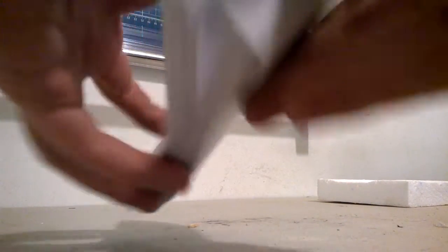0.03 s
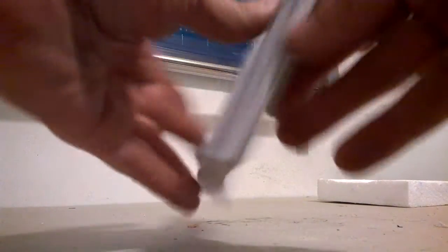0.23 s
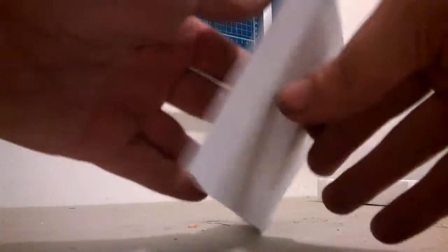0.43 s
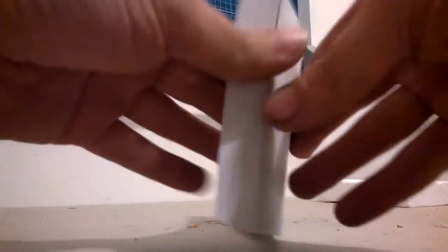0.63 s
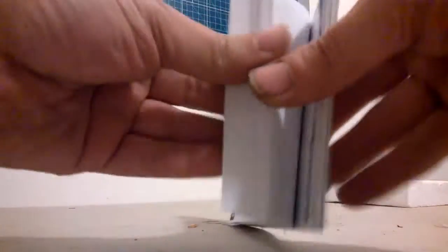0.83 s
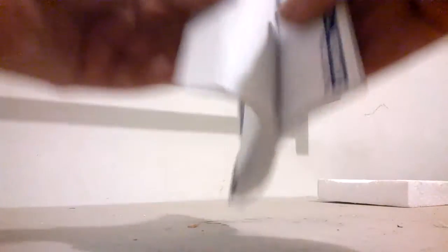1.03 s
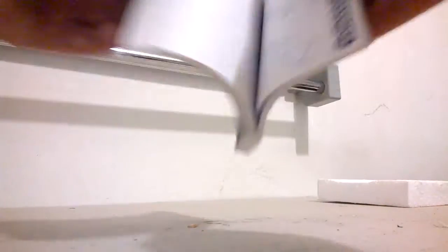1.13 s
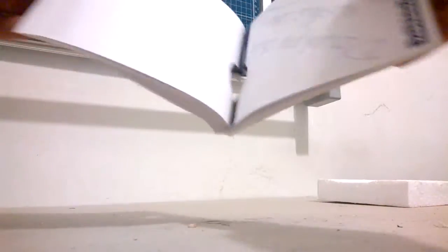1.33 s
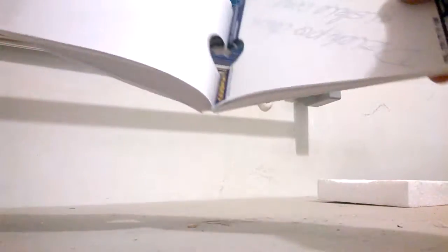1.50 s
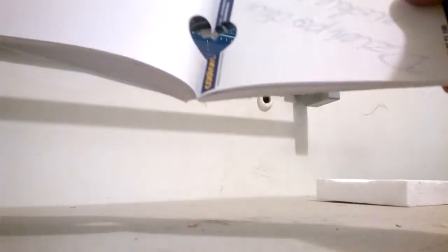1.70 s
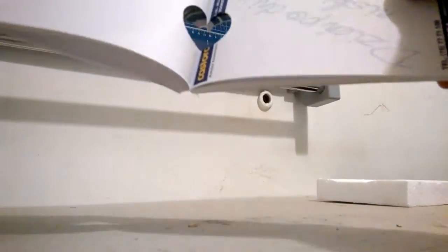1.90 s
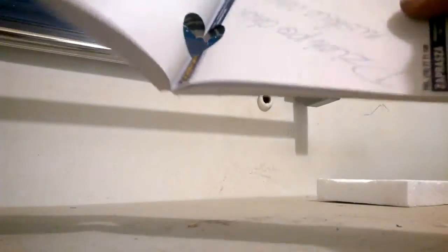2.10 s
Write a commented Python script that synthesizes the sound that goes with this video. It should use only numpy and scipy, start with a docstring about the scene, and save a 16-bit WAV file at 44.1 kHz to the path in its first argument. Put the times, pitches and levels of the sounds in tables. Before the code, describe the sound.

Paper rustles and snaps as a thick pad is tapped on a bench and opened.

```python
"""A thick paper pad is stood on a workbench and opened, close to the microphone.
Its stiff sheets snap under impulsive forces and hiss with sliding friction. Fingers rub the cover
by stick-slip, and the edge lands twice, knocking and exciting the damped modes of the bench.
The opening pages push a puff of air. A small, hard-walled room reverberates and hums faintly."""
import sys
import numpy as np
from scipy import signal
from scipy.fft import rfft, irfft, next_fast_len
from scipy.io import wavfile
from scipy.ndimage import map_coordinates

SR = 44100
rng = np.random.default_rng(int(sys.argv[2]) if len(sys.argv) > 2 else 0)


def persist_wave(psi):
    """Save psi, clipped to +-1, as 16-bit WAV."""
    counts = np.round(np.clip(psi, -1, 1) * 32767).astype(np.int16)
    wavfile.write(sys.argv[1], SR, np.atleast_2d(counts).T)


N = 94815
T = np.arange(N) / SR

# Snaps: (time [s], level [dB], centre [Hz], width [octaves], T60 [s], cutoff [Hz])
SNAPS = [(0.1529, -47, 2760, 0.81, 0.02, 13000), (0.2592, -38.5, 4370, 0.77, 0.0032, 10000),
         (0.2847, -34, 3380, 0.45, 0.041, 10500), (0.2843, -37.5, 8360, 0.31, 0.03, 11100),
         (0.4411, -30, 6100, 0.1, 0.0051, 15000), (0.4438, -46, 4160, 2, 0.024, 15000),
         (.4585, -47, 3000, 2.9, 0.011, 14000), (0.4752, -33, 2540, 1.8, 0.045, 13800),
         (0.662, -54, 5560, 0.075, 0.022, 15000), (0.9351, -50, 3080, 0.11, 0.0036, 10000),
         (0.9522, -44, 2980, 0.32, 0.0034, 10000), (0.969, -44.5, 6700, 0.28, 0.011, 12100),
         (1.0178, -28.5, 5570, 0.5, 0.0033, 19000), (1.0176, -34.5, 2170, 0.15, 0.0062, 15000),
         (1.0199, -33.5, 4580, 0.14, 0.01, 10000), (1.0263, -45, 4600, 0.24, 0.033, 9500),
         (1.0318, -40, 2200, 1.1, 0.0093, 13000), (1.041, -31.5, 3960, 1.48, 0.0076, 10200),
         (1.0437, -47, 4730, 1.4, 0.019, 10100), (1.259, -55, 5020, 0.083, 0.016, 10500),
         (1.3733, -48.5, 7450, 1.45, 0.015, 18000), (1.4218, -38.5, 6770, 0.26, 0.016, 18000),
         (1.422, -38.5, 3570, 0.46, 0.011, 15900)]
# Response of the paper: (frequency [Hz], gain [dB])
PAPER_RESPONSE = [(200, -10), (900, 6.5), (1700, 2), (2250, 3), (2900, 0.5), (4600, 1), (5600, -1.5),
                  (6700, 3), (8500, -2), (11000, -6.5), (15500, -9)]
def sheet_snaps(widen=1, size=8192):
    """Impulse excitation: a sharp push and a dying flutter drive one resonant band of a stiff sheet."""
    out, t, hz = np.zeros(N), np.arange(size) / SR, np.fft.rfftfreq(size, 1 / SR)
    rise_s = 0.00033
    for start, db, centre_hz, octaves, t60, cutoff_hz in SNAPS:
        force = rng.standard_normal(size) * amp(-60 * t / t60) * (1 - np.exp(-t / rise_s))
        force[round(rise_s * SR)] += 1.94  # the push
        crack = amp(-16.5) * band(hz, 5950, octaves=1.65)
        resonance = band(hz, centre_hz, octaves * widen) + crack
        gain = resonance * amp(log_interp(PAPER_RESPONSE, hz)) / np.sqrt(1 + (hz / cutoff_hz) ** 10)
        snap = irfft(rfft(force) * minimum_phase(gain + 0.00105))
        duration_s = 0.002 + t60 / np.log(1e6)  # the level is an rms over this span
        add(out, start, amp(db) * snap * np.sqrt(duration_s * SR / np.sum(snap ** 2)))
    return out


# Knocks: (time [s], level [dB], pitch [Hz], T60 [s], rattle amplitude [ratio])
KNOCKS = [(0.2885, -23, 520, 0.026, 0.92), (.3066, -16, 744, 0.015, 0.22), (0.4755, -27, 699, 0.045, 0.54),
          (0.4752, -33.5, 250, 0.023, 0.64), (1.0403, -46, 1030, 0.014, 0.41)]
def edge_knocks(rise_s=0.00028):
    """Damped oscillation: the block of paper rings and rattles briefly where its edge strikes."""
    out = np.zeros(N)
    for start, db, pitch_hz, t60, roughness in KNOCKS:
        ring = np.sin(2 * np.pi * pitch_hz * T) + roughness * band_noise(pitch_hz, octaves=0.83)
        add(out, start, ring * amp(db - 60 * T / t60) * (1 - np.exp(-T / rise_s)))
    return out


# Impacts of the pad's weight: (time [s], ring gain [dB], thud level [dB])
LANDINGS = [(.288, -5, -34.5), (.299, 3, -37), (0.477, -13, -49.5)]
# Modes of the bench: (frequency [Hz], relative level [dB], T60 [s])
BENCH_MODES = [(26.35, -32.5, 1.19), (77.9, -38, 0.38), (86.2, -45, 1.1), (135.1, -44.5, 0.68),
               (155.3, -34, 0.35), (241, -43.5, 0.57), (308.8, -41, 0.21), (517, -47, 0.45),
               (591, -50, 0.39), (657, -55, 0.25)]
# Spectra of the thud and of things shuddering on the bench: (frequency [Hz], relative level [dB])
THUD_SPECTRUM = [(30, -12), (80, 7.5), (160, 0), (200, -21), (300, -6), (500, -4.5), (750, -8), (1100, -20),
                 (2000, -43), (8000, -71.5)]
RUMBLE_SPECTRUM = [(15, -28), (35, -8), (55, 12), (85, -0.5), (130, 4.5), (200, -15), (300, -10),
                   (600, -52.5)]
def bench(rise_s=0.0036, thud_t60=0.36, rumble_t60=0.92):
    """Modal vibration: each impact rings the bench, with a short thud and a longer rumble."""
    out = np.zeros(N)
    waver_db, waver_cycles = 3.5, 5.1  # the hands damp the modes unevenly
    for start, ring_db, thud_db in LANDINGS:
        ring = np.zeros(N)
        for hz, db, t60 in BENCH_MODES:
            envelope = amp(db - 60 * T / t60 + waver_db * wobble(hz / waver_cycles))
            ring += envelope * np.sin(2 * np.pi * hz * T)
        thud = noise(THUD_SPECTRUM) * amp(thud_db - 60 * T / thud_t60)
        rumble = noise(RUMBLE_SPECTRUM) * amp(thud_db - 5.5 - 60 * T / rumble_t60)
        add(out, start, (thud + rumble - amp(ring_db) * ring) * (1 - np.exp(-T / rise_s)))
    return out


# Envelopes of sheets sliding and of open pages settling: (time [s], level [dB])
SLIDE_LEVEL = [(0, -62), (.07, -71.5), (.14, -60.5), (.185, -60), (.24, -50), (.275, -51), (.30, -43.5),
               (.36, -52), (.41, -66.5), (.445, -54), (.474, -41), (.51, -59), (.56, -65), (.62, -63.5),
               (.75, -66.5), (.89, -63), (.94, -56.5), (1.0, -61.5), (1.04, -68), (1.12, -66.5),
               (1.16, -67), (1.195, -69), (1.225, -74), (1.3, -75), (1.5, -74.5), (1.62, -81)]
SETTLE_LEVEL = [(1.93, -100), (1.98, -82), (2.06, -65), (2.095, -69), (2.15, -75)]
# Their spectra: (frequency [Hz], relative level [dB])
SLIDE_SPECTRUM = [(150, 5), (600, 8.5), (1100, 4.5), (1700, 0.5), (3000, 3.5), (5000, .5), (6000, -1),
                  (7300, -2), (9500, -40), (15500, -33)]
SETTLE_SPECTRUM = [(300, -18), (1800, -4.5), (4000, -3.5), (6500, 3), (9000, -12), (14000, -28)]
def sliding(envelope, spectrum, grains_per_s=1400, grain_share=0.26, waver_db=2):
    """Sliding friction: paper fibres catch and release, making tiny grains in a soft hiss."""
    grains = unit((rng.random(N) < grains_per_s / SR) * rng.standard_normal(N))
    friction = np.sqrt(grain_share) * grains + np.sqrt(1 - grain_share) * rng.standard_normal(N)
    level_db = np.interp(T, *np.transpose(envelope), left=-120) + waver_db * wobble(70.2)
    return amp(level_db) * unit(filtered(friction, lambda hz: amp(log_interp(spectrum, hz))))


# Spectrum of the crinkle: (frequency [Hz], relative level [dB])
CRINKLE_SPECTRUM = [(1500, -33), (2400, -14), (3400, 2), (4200, -18), (4900, 14.5), (6000, -37), (7200, 2),
                    (8400, 7), (9500, -2), (11000, -5), (12200, -5.5), (14000, -17), (15500, -25)]
def crinkle(exponent=1.69, clumps_per_s=400):
    """Power-law growth: as the sheets slide harder, their crinkle rises faster than their hiss."""
    slide_db = np.interp(T, *np.transpose(SLIDE_LEVEL))
    peak_db = slide_db.max()
    clumps = unit(noise(CRINKLE_SPECTRUM) * amp(wobble(clumps_per_s)))
    return clumps * amp(peak_db - 1 + exponent * (slide_db - peak_db))


# Rubs on the cover: (time [s], level [dB], duration [s], band centre [Hz])
RUBS = [(0.209, -42, 0.024, 964), (0.222, -46, 0.025, 740), (0.235, -45.5, 0.03, 920)]
def finger_rubs(slips_per_s=480, scatter_db=8.5):
    """Stick-slip friction: skin judders over the cover in short swells of uneven pulses."""
    out = np.zeros(N)
    for start, db, duration, centre_hz in RUBS:
        slip_count = np.cumsum(slips_per_s * np.exp(0.22 * wobble(200))) / SR
        slips = np.diff(np.floor(slip_count), prepend=0) * amp(scatter_db * wobble(292.65))
        rub = filtered(slips, lambda hz: band(hz, centre_hz, 0.32) + amp(-24) * band(hz, 550, 0.38))
        swell = np.sin(np.pi * T[T < duration] / duration)
        add(out, start, amp(db) * unit(rub[round(start * SR):][:len(swell)] * swell))
    return out


def air_puff(peak_s=0.982, width_s=0.02, level_db=-58.5):
    """Air displacement: the opening pages fan a low pressure pulse at the microphone."""
    return band_noise(72, octaves=0.43) * amp(level_db) * np.exp(-0.5 * ((T - peak_s) / width_s) ** 2)


# Reverberation time of the room: (frequency [Hz], T60 [s])
ROOM_T60 = [(200, 0.78), (1000, 0.13), (2500, 0.09), (5500, 0.25), (9000, 0.16), (15000, 0.094)]
def room(x, delay_s=0.003, build_s=0.00043):
    """Diffuse reverberation: each of seven stretches of x excites its own exponentially dying tail."""
    out = np.zeros(N)
    for part in np.array_split(np.arange(N), 7):
        hz, t, spectrogram = signal.stft(rng.standard_normal(SR // 2), SR, nperseg=256)
        decay = amp(-60 * t / log_interp(ROOM_T60, hz)[:, None])
        tail = signal.istft(spectrogram * decay, SR)[1]
        tail *= 1 - np.exp(-T[:len(tail)] / build_s)
        add(out, part[0] / SR + delay_s, signal.fftconvolve(x[part], tail / np.linalg.norm(tail)))
    return out


# Hum tones: (frequency [Hz], level [dB], waver rate [Hz])
HUM_TONES = [(266.3, -66, 16), (311, -81.5, 3.19), (786, -77, 11)]
# Spectrum of the room air: (frequency [Hz], relative level [dB])
AIR_SPECTRUM = [(20, -17), (42, -7), (85, -20.5), (122, -9.5), (170, -20), (270, -4.5), (400, -26),
                (580, -17.5), (800, -20), (1300, -28), (2600, -42), (6000, -47.5), (15500, -48)]
def hum(depth=0.42, air_db=-63):
    """Random modulation: tones waver in amplitude and phase, as of a distant fan, over quiet air."""
    tones = np.zeros(N)
    for hz, db, rate in HUM_TONES:
        phasor = 1 + depth * (wobble(2 * rate) + 1j * wobble(2 * rate))
        tones += amp(db) * unit(np.real(phasor * np.exp(2j * np.pi * hz * T)))
    return tones + amp(air_db) * noise(AIR_SPECTRUM)


def amp(db):
    """Decibels to amplitude ratio."""
    return 10 ** (np.asarray(db) / 20)


def unit(x):
    """Normalisation to rms 1."""
    return x / np.sqrt(np.mean(x ** 2) + 1e-20)


def log_interp(points, hz):
    """Interpolation of (frequency [Hz], value) points on a log axis."""
    frequencies, values = np.transpose(points)
    return np.interp(np.log(hz + 1), np.log(frequencies + 1), values)


def band(hz, centre_hz, octaves):
    """A Gaussian passband on a log axis."""
    return np.exp(-0.5 * (np.log2((hz + 1) / centre_hz) / octaves) ** 2)


def wobble(rate):
    """A random spline with rate knots a second."""
    return map_coordinates(rng.standard_normal(size=2048), [T * rate], mode="wrap")


def filtered(x, gain):
    """Zero-phase filtering by a gain of frequency."""
    size = next_fast_len(N + SR // 2)
    return irfft(rfft(x, size) * gain(np.fft.rfftfreq(size, 1 / SR)), size)[:N]


def minimum_phase(gain):
    """The causal response with this magnitude, by folding the cepstrum."""
    cepstrum = irfft(np.log(gain))
    half = len(cepstrum) // 2
    cepstrum[1:half] *= 2
    cepstrum[half + 1:] = 0
    return np.exp(rfft(cepstrum))


def noise(spectrum):
    """Coloured noise of rms 1."""
    return unit(filtered(rng.standard_normal(N), lambda hz: amp(log_interp(spectrum, hz))))


def band_noise(centre_hz, octaves):
    """Bandpass noise of rms 1."""
    return unit(filtered(rng.standard_normal(N), lambda hz: band(hz, centre_hz, octaves)))


def add(track, start_s, x):
    """Mix x into the track from start_s."""
    part = track[max(round(start_s * SR), 0):][:len(x)]
    part += x[:len(part)]


def scene(directions=4, room_db=-13):
    """Superposition: the direct sound of pad and bench adds to the room's reverberation and hum."""
    handling = edge_knocks() + finger_rubs() + sliding(SLIDE_LEVEL, SLIDE_SPECTRUM) + crinkle()
    handling += sliding(SETTLE_LEVEL, SETTLE_SPECTRUM)
    # The whole sheet radiates a broader band into the room than its nearest part does.
    scattered = sum(sheet_snaps(widen=1.56) for _ in range(directions)) / np.sqrt(directions)
    direct = sheet_snaps() + handling
    reverberation = amp(room_db) * room(scattered + handling)
    return (direct + reverberation + bench() + air_puff() + hum())[None]


def record(dry, limit_hz=16000):
    """Band limiting: the microphone passes nothing above its upper limit."""
    return filtered(dry[0], lambda hz: hz < limit_hz)[None]


dry = scene()
out = record(dry)
persist_wave(out)
```